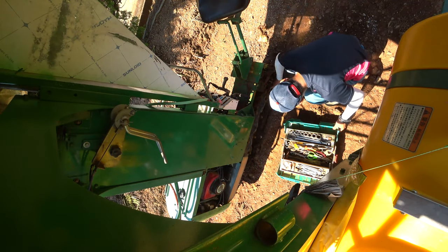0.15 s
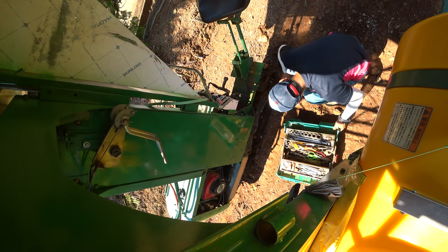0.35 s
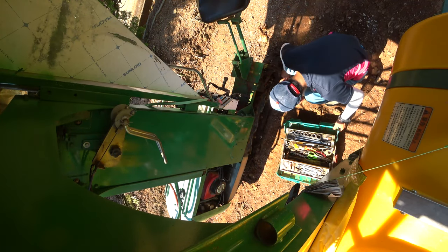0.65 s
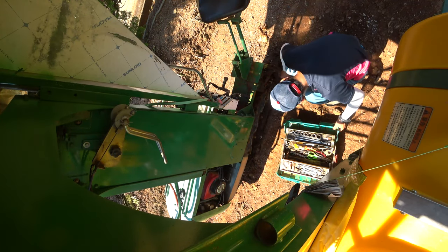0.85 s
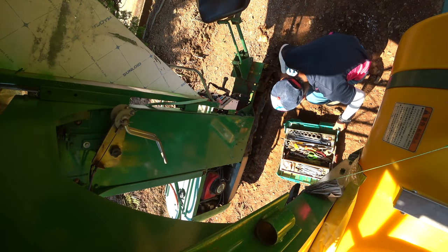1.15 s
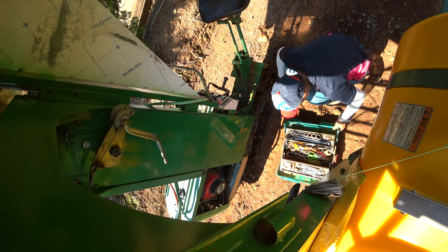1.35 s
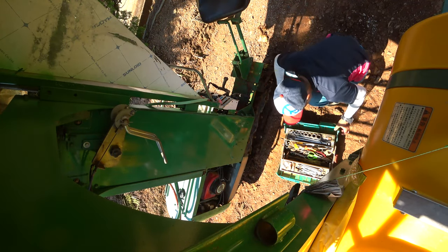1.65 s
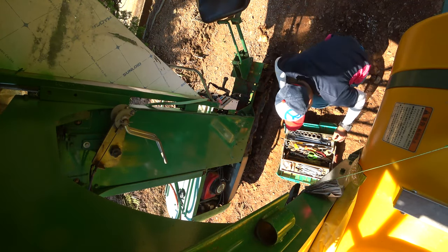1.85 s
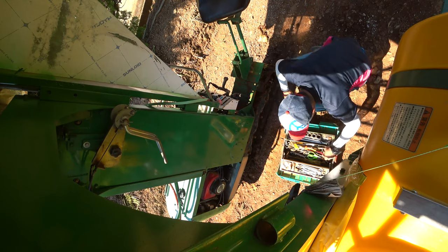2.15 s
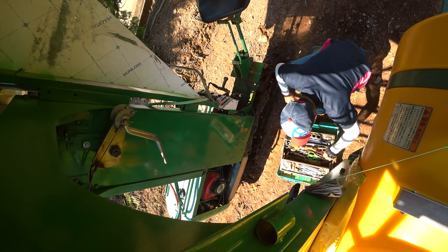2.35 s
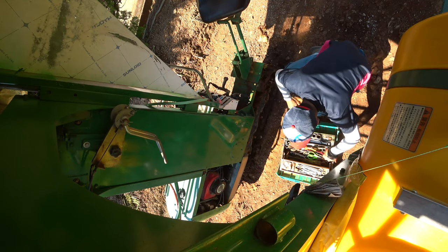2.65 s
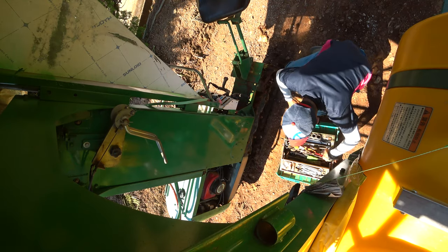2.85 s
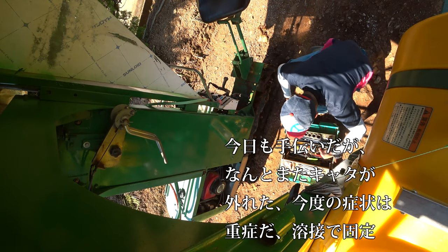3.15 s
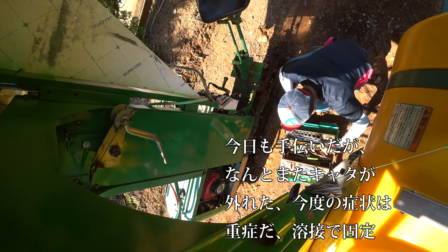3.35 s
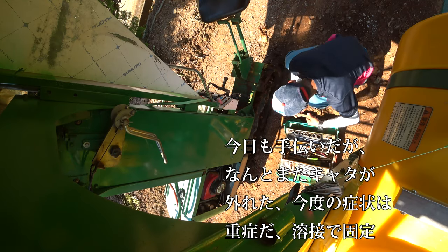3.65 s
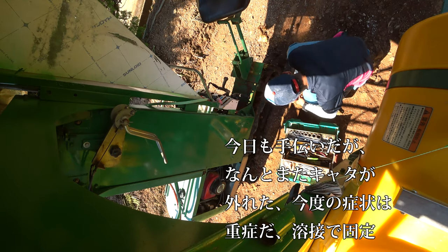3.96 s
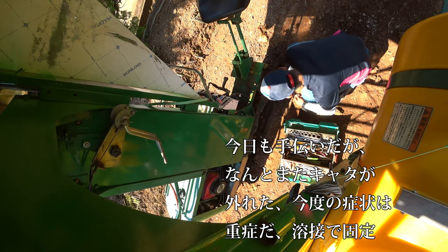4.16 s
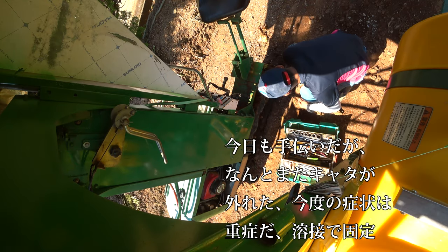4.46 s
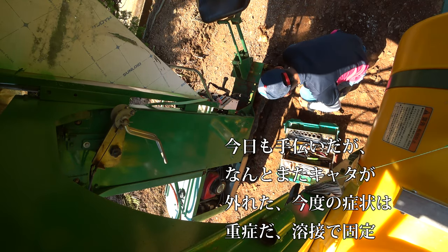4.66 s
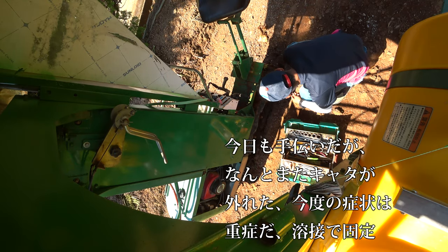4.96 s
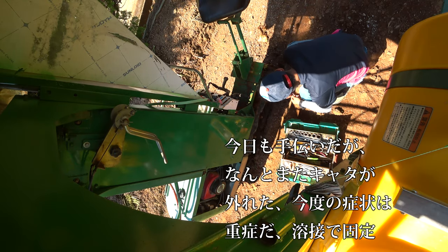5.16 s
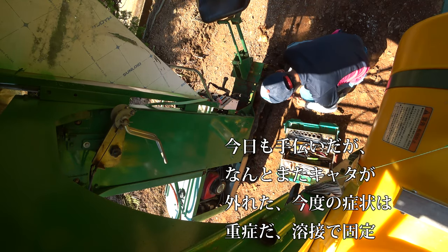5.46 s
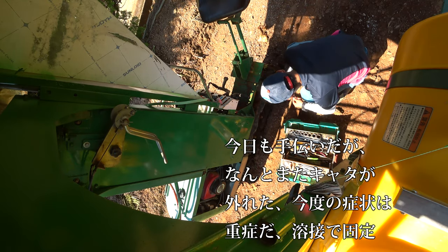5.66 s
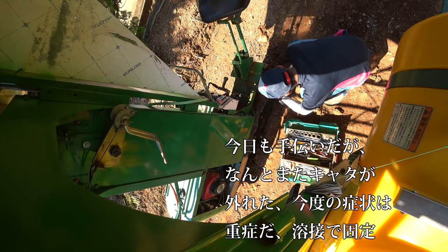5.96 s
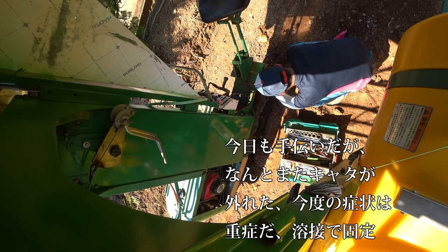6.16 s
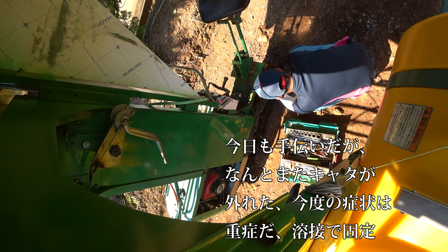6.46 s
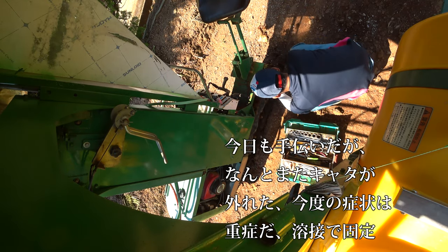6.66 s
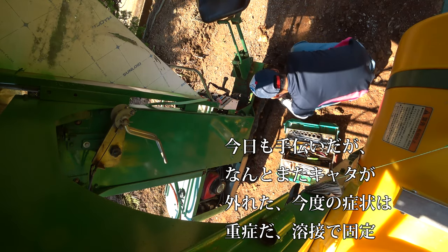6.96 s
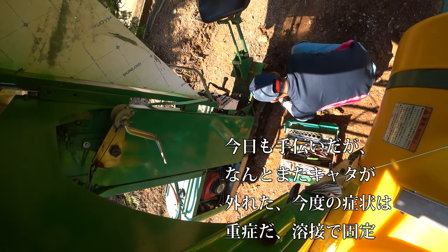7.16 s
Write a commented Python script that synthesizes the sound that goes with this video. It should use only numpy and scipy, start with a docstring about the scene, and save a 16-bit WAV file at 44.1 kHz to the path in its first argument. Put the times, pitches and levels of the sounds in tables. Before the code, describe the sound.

Gentle open-air noise with short, clear bird whistles and a faint, very high repeating pip. After a couple of seconds, wrenches and sockets rattle together in a metal box, growing to sharp high clinks, then stopping abruptly. Soft clothing rustle and scuffing follow, with isolated hollow box clunks, tiny ticks and more birds. A loud clank closes it. Slight reflections from nearby machinery; the stereo microphone is a few metres off.

```python
"""A hand rummages in a steel toolbox in a farmyard, a few metres below a small stereo microphone.
Box, wrenches and sockets are struck sets of decaying modes over a rasp; a hail of tiny contacts slides.
Filtered grains rustle as sleeves and scuff lower; gliding sines whistle as warblers, a thin pip repeats.
Sheds throw back a faint scatter; shaped stereo noise is the field air and hiss."""
import sys
import numpy as np
from scipy import signal
from scipy.fft import rfft, irfft
from scipy.io import wavfile
from scipy.ndimage import uniform_filter1d

SR = 44100
rng = np.random.default_rng(int(sys.argv[2]) if len(sys.argv) > 2 else 0)


def generate_wav(sig):
    """Save sig (samples, or channels by samples) to the path in sys.argv[1] as 16-bit PCM at SR."""
    pcm = np.round(np.clip(np.atleast_2d(sig).T, -1, 1) * 32767).astype(np.int16)
    wavfile.write(sys.argv[1], SR, pcm)


N = 322371

# Blows in the box. Each row: start in seconds, level in dB of box, wrench, socket and socket top,
# favoured pitch in Hz of the same four, damped ring time as a share of the free one, rasp in dB.
BLOW_ROWS = [(2.552, -50.5, -58, -68, -59.5, 743, 2400, 6020, 9700, .52, -1.5),
             (2.579, -50, -49.5, -60, -73, 785, 2340, 7040, 9460, 1.9, -2),
             (2.772, -48, -54, -58, -56.5, 843, 2150, 7340, 10600, .47, 3.5),
             (2.786, -47, -50.5, -59, -61, 895, 1960, 6490, 10770, 0.19, 2),
             (2.817, -39, -44, -49.5, -59, 728, 3600, 6930, 10200, 1.05, -0.5),
             (2.884, -41, -33.5, -26.5, -26.5, 1430, 3900, 8100, 9930, 1.4, -9),
             (2.892, -40.5, -26, -26, -21.5, 990, 4290, 6520, 10250, 0.95, -8),
             (2.914, -39.5, -31.5, -39, -40, 1460, 4400, 6840, 10000, 0.49, 1),
             (2.926, -33.5, -35, -33, -37, 885, 3610, 5950, 10500, 0.78, -13),
             (2.948, -40.5, -38.5, -44, -62, 920, 2980, 6780, 10310, 0.47, -13),
             (2.988, -31.5, -23, -32.5, -40, 784, 4590, 7100, 10870, .27, -5.5),
             (3.013, -44, -35, -28, -32, 774, 5570, 7710, 10850, 0.65, -0.5),
             (3.041, -37.5, -32, -29, -29, 734, 5200, 6450, 10160, 1.9, 0),
             (3.077, -35.5, -26.5, -31, -36, 1640, 4370, 6760, 9800, 0.76, -12),
             (3.087, -35, -32, -29.5, -31, 764, 2840, 6630, 10000, 0.52, 0),
             (3.142, -48, -23.5, -28, -32, 780, 2143, 6780, 10800, 0.81, -4),
             (3.169, -36.5, -31, -31, -37, 960, 3080, 5950, 9300, 0.97, -5),
             (3.205, -29.5, -30, -26, -29, 820, 3720, 5730, 10900, 0.24, -7),
             (3.221, -41, -26.5, -26, -25, 720, 4500, 6200, 10870, .28, 0),
             (3.245, -41, -56, -33, -40, 920, 3770, 6030, 9300, 0.41, 0),
             (3.257, -32, -35.5, -32, -47, 760, 4150, 6160, 9360, 0.22, 4.5),
             (3.268, -27.5, -36, -30.5, -37, 1014, 3740, 6250, 10400, 0.69, 1),
             (3.309, -50, -25.5, -24, -20, 1190, 3780, 6070, 10700, 0.31, 0),
             (3.319, -35, -26.5, -15.5, -3, 870, 3780, 6470, 10000, .28, -10.5),
             (3.338, -48, -32.5, -22.5, -21.5, 1497, 5310, 6570, 10400, 0.25, -3),
             (3.349, -35, -26, -30, -31.5, 613, 3800, 6560, 9950, 0.44, 1),
             (3.361, -26.5, -14.5, -9.5, -11, 873, 5220, 6810, 9100, 0.55, -3.5),
             (3.377, -32, -27, -21, -13, 1670, 5120, 6470, 9340, 0.72, -5.5),
             (3.398, -34, -34.5, -28.5, -27, 760, 4020, 6490, 15070, .39, 0),
             (4.392, -22.5, -28, -47, -50.5, 662, 2830, 6860, 10400, 0.6, 2.5),
             (4.423, -18.5, -29.5, -48, -69, 752, 3350, 5940, 10390, 0.78, -6),
             (4.742, -51.5, -70.5, -70, -67.5, 1117, 1950, 6470, 10500, 0.46, -4.5),
             (5.062, -74, -49.5, -61, -67.5, 947, 4290, 6850, 11300, 1.6, -26.5),
             (5.205, -38, -46, -59, -57.5, 642, 4280, 6740, 12660, 0.57, -1),
             (5.283, -67, -57, -61, -64, 460, 3140, 6090, 9700, .6, 0.5),
             (5.351, -24, -26.5, -55.5, -60, 921, 3280, 6750, 12800, 0.91, -1.5),
             (5.377, -32.5, -36, -55.5, -56, 1144, 3286, 5650, 10700, 0.77, -0.5),
             (5.446, -46.5, -62, -71.5, -70, 740, 4280, 6200, 10200, 1.1, 0.5),
             (6.294, -58, -53, -73.5, -62.5, 820, 1970, 6300, 10670, 0.63, -3.5),
             (6.424, -48.5, -56.5, -67.5, -76, 1644, 2000, 5850, 9800, 0.57, -3),
             (6.604, -54, -55.5, -69.5, -70, 800, 2010, 6960, 15300, .49, 0),
             (6.622, -51, -56.5, -64.5, -67, 726, 3830, 6200, 10860, 0.75, -2),
             (6.815, -52, -57, -65, -64.5, 1133, 1960, 6740, 11530, .5, -5),
             (6.875, -42.5, -56, -58, -69, 950, 3770, 6820, 11070, 0.82, -12),
             (6.892, -50.5, -48, -66, -60.5, 1080, 3640, 5650, 10300, 0.5, -3.5),
             (6.911, -52.5, -48, -63, -67, 940, 2010, 6670, 9300, .47, -1),
             (6.994, -48, -55.5, -55, -46, 1010, 3270, 5990, 10600, 1.06, -1.5),
             (7.284, -20, -5, -15, -27.5, 1312, 3930, 6900, 10850, 0.15, -5),
             (7.293, -19.5, -11, -21.5, -45, 1790, 3270, 7040, 10010, 0.27, -1.5)]
# Ringing modes of the box and of the tools in it.
# Each row: pitch in Hz, relative level in dB, free decay of 60 dB in seconds.
BOX_MODES = [(300, -20, .15), (484, -12, .15), (560, -9, .12), (630, -6, .14), (662, -9, .18),
             (738, -4, .1), (818, -23, 1.3), (860, -6, .1), (921, -7, .11), (1007, -5, .12), (1090, -8, .1),
             (1174, -6, .12), (1308, -9, .11), (1427, -9, .1), (1610, -8, .1), (1690, -10, .08),
             (1830, -11, .08)]
WRENCH_MODES = [(1960, -12, .07), (2140, -5, .07), (2400, -15, .06), (2840, -6, .1), (2990, -10, .08),
                (3090, -10, .08), (3275, -7, .09), (3430, -8, .08), (3640, -8, .1), (3790, -7, .1),
                (4045, -8, .1), (4280, -6, .12), (4400, -10, .08), (4600, -10, .08), (4760, -11, .08),
                (5040, -10, .1), (5208, -7, .08)]
SOCKET_MODES = [(5730, -10, .08), (5940, -12, .08), (6200, -9, .08), (6282, -6, .09), (6443, -5, .1),
                (6515, -6, .09), (6854, -4, .11), (7050, -12, .08), (7413, -13, .09), (7710, -12, .08),
                (8070, -14, .09), (8320, -13, .11)]
SOCKET_TOP_MODES = [(9327, -7, .08), (9995, -9, .1), (10102, -3, .11), (10256, -12, .09), (10856, -10, .09),
                    (11780, -14, .1), (12050, -16, .18), (12765, -11, .09), (13050, -16, .06),
                    (13560, -16, .09), (14712, -8, .2), (15472, -14, .14)]
# Contact of box, wrench, socket and socket top, in that order. Each row: base rasp level in dB, rasp decay
# of 60 dB in seconds, blur of the modes as share of their Hz, lift of the favoured mode in dB,
# left minus right in dB, unlike share at the two ports (0-1).
CONTACTS = [(-2, 0.18, 0.086, 10, 3, 0.33), (-1.5, 0.12, 0.1, 12.0, -1, .25),
            (1, 0.12, .05, 10.0, -1.5, .3), (0.5, 0.053, .08, 12.5, -.5, 0.4)]
# Loose tools sliding over each other. Each row: time in seconds, box in dB, tools in dB, before object trims.
SLIDE_LEVELS = [(2.74, -70, -67), (2.9, -51, -63), (3.05, -34, -35), (3.124, -41, -43),
                (3.214, -30.5, -34.5), (3.272, -34.5, -33), (3.4, -58.5, -64.5), (3.46, -54.5, -66)]
# Sleeves and trousers brushing. Each row: peak time in seconds, length in seconds, level in dB.
BRUSHES = [(.2, 0.75, -62), (1.39, 0.14, -67.5), (2.585, 0.049, -56.5), (2.69, .07, -70),
           (3.69, .08, -66.5), (3.88, 0.15, -61.5), (4.163, 0.25, -56.5), (4.867, .1, -58),
           (4.938, 0.066, -58.5), (5.079, 0.11, -59), (5.289, 0.055, -63), (5.6, 0.26, -60),
           (6.1, 0.25, -62.5), (6.635, .15, -65.5), (6.9, 0.48, -57), (7.21, .2, -62)]
# Low scuffing of feet and knees. Each row: time in seconds, level in dB.
SCUFF_LEVELS = [(0, -63), (.5, -64.5), (1, -67), (2.5, -74), (2.585, -58), (2.67, -67.5), (3.47, -60),
                (3.7, -64.5), (4.2, -63), (4.4, -63.5), (4.9, -67.5), (5.35, -64.5), (5.45, -62.5),
                (5.8, -63), (6.3, -65), (6.55, -58.5), (6.7, -61.5), (6.9, -56.5), (7.3, -63)]
# Whistled notes. Each row: start in seconds, length in seconds, pitch in Hz at start, turn and end,
# place of the turn (0-1), level in dB that the swell reaches at the end.
WHISTLES = [(0, 0.46, 2540, 2542, 2503, 0.31, -49.5), (0.079, .14, 1075, 1095, 1090, 0.7, -60),
            (0.138, 0.051, 5170, 3580, 3500, 0.42, -62), (0.524, 0.049, 2180, 1794, 1804, 0.54, -49),
            (0.639, 0.055, 2190, 2520, 2100, 0.72, -46.5), (0.689, 0.11, 1070, 1060, 1063, .5, -62),
            (0.747, .022, 4700, 4420, 3400, 0.5, -58.5), (0.767, 0.0202, 2750, 2610, 2820, 0.55, -48),
            (0.787, 0.035, 3020, 3600, 2240, .35, -60), (0.874, 0.031, 1740, 1975, 1790, 0.52, -55),
            (1.192, .07, 5060, 5090, 5080, 0.6, -63), (1.354, .03, 4970, 4400, 4300, .35, -60),
            (2.465, 0.032, 5000, 4180, 3750, .45, -67), (2.669, 0.024, 4570, 4530, 4070, 0.57, -61),
            (3.551, .03, 2120, 2210, 2230, .5, -64), (3.75, .022, 2074, 1984, 1913, 0.55, -60),
            (3.864, 0.034, 2160, 2150, 1910, 0.34, -57), (4.012, .035, 2110, 1930, 1910, 0.5, -62),
            (4.373, .018, 3900, 4580, 4123, 0.53, -51.5), (5.44, 0.021, 2290, 2200, 2192, 0.25, -56.5),
            (5.607, 0.033, 1836, 1740, 1744, 0.46, -57.5), (6.155, 0.13, 1870, 1862, 1880, 0.34, -59),
            (6.39, 0.058, 1660, 1712, 1680, .4, -52), (6.528, 0.07, 1690, 1948, 2840, 0.6, -54),
            (6.62, 0.071, 3700, 3790, 4000, 0.3, -65), (6.704, 0.054, 2500, 1852, 1774, 0.67, -55.5),
            (6.784, 0.047, 1710, 2063, 2150, 0.58, -55)]
# High pips. Each row: start in seconds, level in dB that the swell reaches at the end.
PIP_ROWS = [(.25, -72), (.73, -72), (1.28, -77), (1.71, -72), (2.25, -75), (2.701, -79), (4.76, -72.5),
            (5.76, -75), (6.72, -70)]
# Spectrum of the field air. Each row: frequency in Hz, relative density in dB per Hz.
AIR_SPECTRUM = [(15, -65), (25, -43), (64, -12.5), (170, -10), (223, -6.5), (335, -4.5), (439, -1.5),
                (887, -1), (1440, -4.5), (1700, -4), (1840, -4), (3820, -7), (7920, -12.5), (11600, -12.5),
                (16000, -15.5)]
# Width of the field air. Each row: frequency in Hz, left-right part against the shared part in dB.
AIR_WIDTH = [(60, -16.5), (110, -13.5), (200, -2.5), (380, 2.5), (700, 5.5), (1290, 8.5), (2380, 5.5),
             (4400, 0.5), (8120, -3), (15000, -3)]

AIR_DB = -58.06  # middle level of the shared part
YARD_DB, YARD_T60_S, YARD_GAP_S, YARD_HZ = -20, 0.16, 0.014, 3500
ECHO_DB, ECHO_T60_S = -8, 0.51  # trees and sheds smear the far song
PIP_HZ, PIP_S = 11100, 0.12
NOTE_EDGE_S, SWELL_DB_PER_S = 0.0017, 19.5  # soft ends; a held note grows towards its end
# harder blows rise faster: the rise time constant halves for each HALVING_DB
RISE_MS, RISE_AT_DB, HALVING_DB = 1.0, -47, 39.5
FREE_MS, BLOW_PAN_DB = 16, 0.55  # longest free ring; left minus right
LOPSIDED = .008  # the capsule bends loud waves unevenly, which leaves a low thud
TOP_HZ = 16000  # upper limit of the microphone chain


def undb(db):
    """Decibels to gain."""
    return 10 ** (np.asarray(db) / 20)


def unit(x):
    """Scale to rms 1."""
    return x / np.sqrt(np.mean(x ** 2) + 1e-30)


def pan(db):
    """Gains of left and right port for a left minus right difference in dB."""
    return undb(np.array([[db], [-db]]) / 2)


def band(x, lo_hz, hi_hz, order=2):
    """Butterworth band-pass."""
    return signal.sosfilt(signal.butter(order, [lo_hz, hi_hz], "bandpass", fs=SR, output="sos"), x)


def highpass(x, hz, order):
    """Butterworth high-pass."""
    return signal.sosfilt(signal.butter(order, hz, "highpass", fs=SR, output="sos"), x)


def fade(t, t60):
    """Decay of 60 dB in t60 seconds."""
    return np.exp(-np.log(1000) * t / t60)


def scatter(x, tail):
    """Smear a mono sound through a stereo tail scaled to unit energy on the left."""
    return signal.fftconvolve(x[None], tail / np.sqrt(np.sum(tail[0] ** 2)), axes=1)[:, :N]


def curve(rows, column, rest):
    """One column of a table at every sample; rest outside it."""
    rows = np.array(rows, float)
    return np.interp(np.arange(N) / SR, rows[:, 0], rows[:, column], left=rest, right=rest)


def walk(rate):
    """Random levels held 1 / rate seconds and slewed twice; spread near 1."""
    k = int(SR / rate)
    steps = np.repeat(rng.standard_normal(N // k + 1), k)
    return 1.3 * uniform_filter1d(uniform_filter1d(steps, k), k)[:N]


def air():
    """Field noise and hiss; the mid range comes mostly from the sides, in opposite phase at the ports."""
    log_hz = np.log(np.maximum(np.fft.rfftfreq(N, 1 / SR), 1))
    spectrum, width = np.array(AIR_SPECTRUM), np.array(AIR_WIDTH)
    shape_db = np.interp(log_hz, np.log(spectrum[:, 0]), spectrum[:, 1])
    side_db = np.interp(log_hz, np.log(width[:, 0]), width[:, 1])
    white = rfft(rng.standard_normal((2, N)))
    mid, side = irfft(white * undb([shape_db, shape_db + side_db]), N)
    level = undb(AIR_DB + 0.287 * walk(0.99))  # drifts slowly
    return np.array([mid + side, mid - side]) * level / np.sqrt(np.mean(mid ** 2))


def yard(x):
    """Machines and sheds around throw back a short, duller scatter, different at each port."""
    t = np.arange(SR // 2) / SR
    tail = rng.standard_normal((2, len(t))) * fade(t, YARD_T60_S) * (t > YARD_GAP_S)
    tail = signal.lfilter(*signal.butter(1, YARD_HZ, fs=SR), tail)
    return undb(YARD_DB) * scatter(x, tail)


def birds():
    """Near-sine whistles with soft ends, rougher where they glide, and the high pips, with an echo tail."""
    out, wobble, flutter = np.zeros(N), walk(60), walk(150)
    pips = [(s, PIP_S, PIP_HZ, PIP_HZ, PIP_HZ, .5, db) for s, db in PIP_ROWS]
    for s, length, start_hz, turn_hz, end_hz, turn, db in WHISTLES + pips:
        a = int(max(s, 0) * SR)
        t = np.arange(int(length * SR)) / SR
        b = a + len(t)
        pitch = np.interp(t / length, [0, np.clip(turn, .1, .9), 1], [start_hz, turn_hz, end_hz])
        pitch = uniform_filter1d(pitch, size=200, mode="nearest")
        # leaves scatter each pitch of a glide differently, so glides break up
        glide = np.tanh(np.abs(np.gradient(np.log(pitch))) * SR / 18.0)
        rough_pitch = pitch * (1 + (0.0014 + 0.072 * glide) * wobble[a:b])
        phase = 2 * np.pi * np.cumsum(rough_pitch) / SR
        swell_db = db - SWELL_DB_PER_S * (length - t)
        size = undb(swell_db - 2.3 * glide + (0.5 + 7.6 * glide) * flutter[a:b])
        edges = np.clip(np.minimum(t, length - t) / NOTE_EDGE_S, 0, 1)
        out[a:b] += np.sqrt(2) * size * edges * np.sin(phase)
    tail = rng.standard_normal((2, SR // 2)) * fade(np.arange(SR // 2) / SR, ECHO_T60_S)
    return out + undb(ECHO_DB) * scatter(out, tail)


def rustle():
    """Cloth hisses in fine grains, high, a swell for each brush; feet and knees scuff lower."""
    t, out = np.arange(N) / SR, 0
    swells = (undb(db) ** 2 * np.exp(-(2.85 * (t - s) / length) ** 2) for s, length, db in BRUSHES)
    cloth = np.sqrt(sum(swells))
    scuff = undb(curve(SCUFF_LEVELS, 1, -64.))
    # level, band in Hz, left minus right in dB
    for level, lo_hz, hi_hz, pan_db in ((cloth, 2200, 5200, 0.44), (scuff, 1100, 1600, 4.9)):
        grains = rng.standard_normal(N) * undb(1.2 * walk(150) + 0.79 * walk(25))
        out = out + level * pan(pan_db) * unit(band(grains, lo_hz, hi_hz))
    return out


def objects():
    """For each object its modes, their waves, and a long noise that holds the same modes blurred."""
    t, hz_axis, out = np.arange(SR // 3) / SR, np.fft.rfftfreq(SR, 1 / SR), []
    for modes, contact in zip((BOX_MODES, WRENCH_MODES, SOCKET_MODES, SOCKET_TOP_MODES), CONTACTS):
        hz, db, t60 = (column[:, None] for column in np.transpose(modes))
        offset = (hz_axis - hz) / (contact[2] * hz)
        power = np.sum(undb(db) ** 2 / (1 + offset ** 2) ** 2, axis=0)
        noise = unit(irfft(rfft(rng.standard_normal((2, SR))) * np.sqrt(power), SR))
        waves = np.exp(2j * np.pi * hz * t)
        out.append((hz, db, t60, waves, noise, contact))
    return t, out


def ring(thing, favourite_hz, rasp_db, age):
    """Answer of one object, left and right: clear modes, weighted by where it is hit, over its rasp."""
    hz, db, t60, waves, noise, contact = thing
    base_db, rasp_t60, _, lift_db, pan_db, unlike = contact
    spot, start = rng.standard_normal((3, len(hz))), rng.integers(SR // 2)
    away = np.log(hz[:, 0] / favourite_hz)
    # the struck spot favours one mode sharply and its neighbourhood broadly
    db = db[:, 0] + 4.5 * spot[0] + lift_db * np.exp(-(away / .015) ** 2)
    db = db + 6.7 * np.exp(-(away / 0.24) ** 2)
    size = undb(db) * np.exp(2j * np.pi * spot[1]) / np.sqrt(np.sum(undb(db) ** 2) / 2)
    # every mode radiates its own way, so it reaches the two ports with its own phase step
    ports = size * np.exp(1j * unlike * spot[2] * np.array([[1], [-1]]))
    clear = (ports @ (waves * fade(age, t60))).imag
    grit = noise[:, start:start + len(age)]
    peak = signal.lfilter(*signal.iirpeak(favourite_hz, 4.0, fs=SR), grit)
    grit = unit(grit + 2.4 * peak)
    shared, own = grit * fade(age, rasp_t60) * undb(base_db + rasp_db)
    rasp = np.array([shared + unlike * own, shared - unlike * own])
    return (clear + rasp) * pan(pan_db)


def slide(t, things):
    """A dense hail of tiny contacts through the same modes, choked by the heap."""
    out = 0
    # trim in dB and favoured Hz of box, wrench, socket, socket top
    for k, (db, hz) in enumerate(((4.0, 1200), (-1, 3600), (-3.5, 6840), (-4.5, 8700))):
        sizes = rng.standard_normal(N) * undb(3.1 * rng.exponential(size=N))
        hail = unit(sizes * (rng.random(N) < .03))
        body = ring(things[k], hz, 4.8, 15.0 * t)  # decays 15 times faster than free
        pushed = hail * undb(db + curve(SLIDE_LEVELS, 1 if k == 0 else 2, -120.))
        out = out + scatter(pushed, body)
    return out


def blows(t, things):
    """Each blow rings box and tools freely for a moment, then at its own damped rate."""
    out = np.zeros((2, N + SR))
    gaps = np.diff([row[0] for row in BLOW_ROWS] + [N / SR + 1])
    for (s, *each, share, rasp_db), gap in zip(BLOW_ROWS, gaps):
        levels, favourites = each[:4], each[4:]
        rise_ms = RISE_MS * 2 ** ((RISE_AT_DB - max(levels)) / HALVING_DB)
        rise = 1 - np.exp(-t * 1000 / rise_ms)
        # after the free ring, time for the decay runs at 1 / share
        damped_s = np.maximum(t - min(FREE_MS / 1000, gap), 0)
        age = t + damped_s * (1 / np.clip(share, .08, 1.5) - 1)
        # the parts keep chattering against each other
        chatter = undb(1.9 * unit(uniform_filter1d(rng.standard_normal(len(t)), size=120)))
        sound = 0
        for thing, db, hz in zip(things, levels, favourites):
            sound = sound + undb(db) * ring(thing, hz, rasp_db, age)
        i = int(s * SR)
        out[:, i:i + len(t)] += rise * chatter * sound * pan(BLOW_PAN_DB)
    return out[:, :N]


def scene():
    """Near metal and far birds share the yard; thin steel sends out little bass."""
    steel = objects()
    metal = highpass(blows(*steel) + slide(*steel), 400, 3)
    sources = metal + birds()
    return sources + yard(sources.mean(axis=0)) + rustle() + air()


def record(dry):
    """Loud waves bend and clip in the microphone, the top is cut."""
    thud = highpass(dry ** 2, 20, 1)
    bent = np.clip(dry + LOPSIDED * thud, -1, 1)
    return signal.sosfilt(signal.ellip(10, .2, 70, TOP_HZ, fs=SR, output="sos"), bent)


dry = scene()
out = record(dry)
generate_wav(out)
```